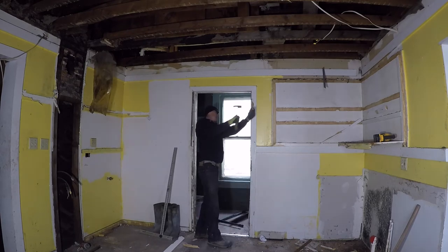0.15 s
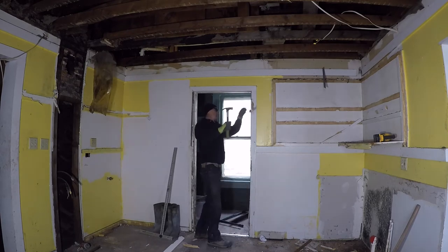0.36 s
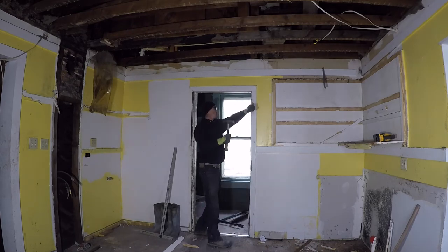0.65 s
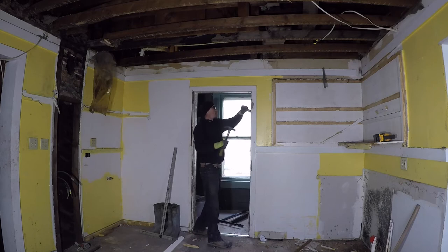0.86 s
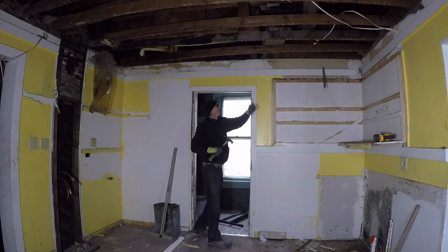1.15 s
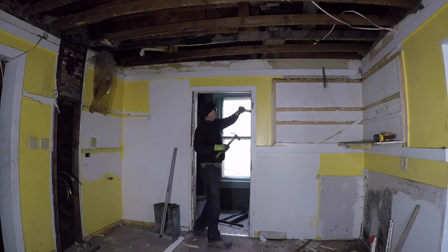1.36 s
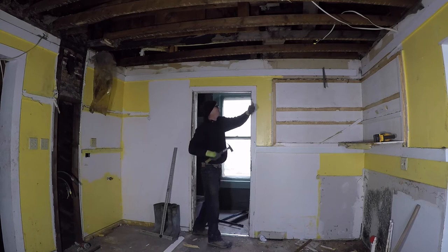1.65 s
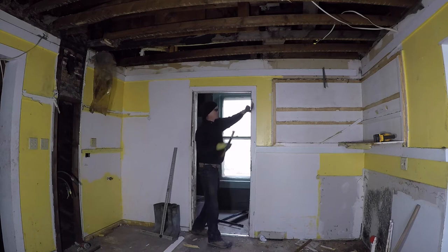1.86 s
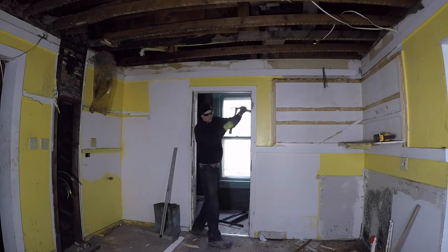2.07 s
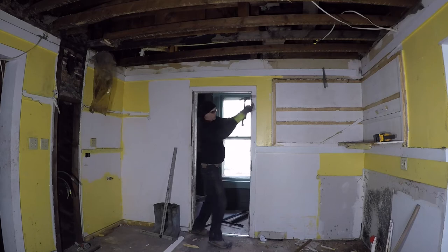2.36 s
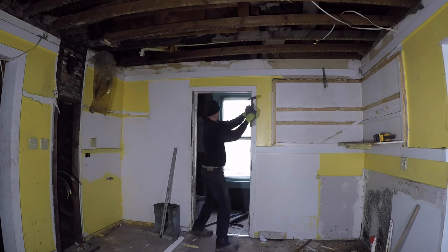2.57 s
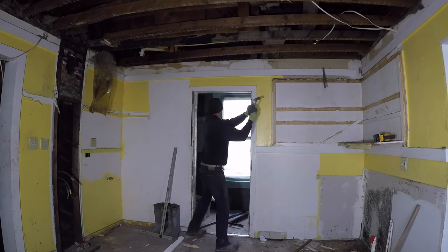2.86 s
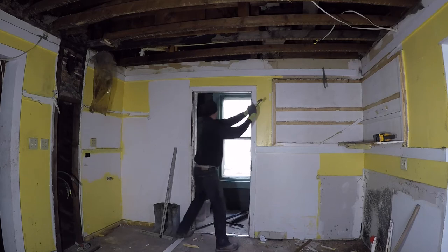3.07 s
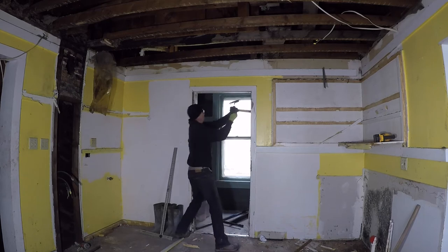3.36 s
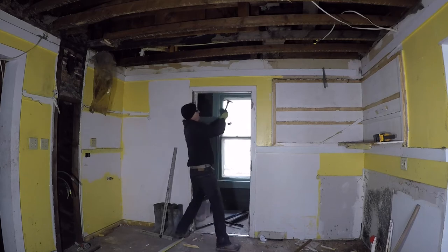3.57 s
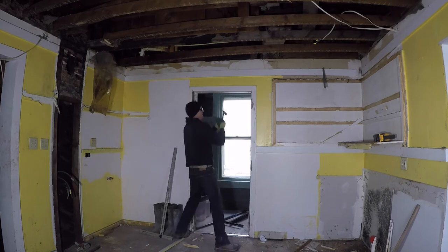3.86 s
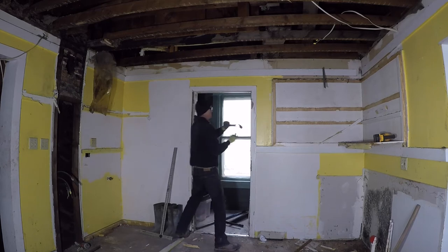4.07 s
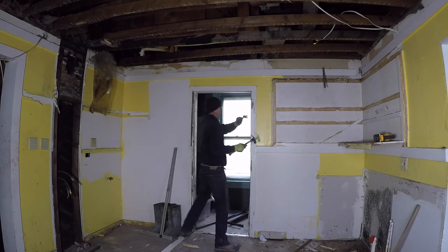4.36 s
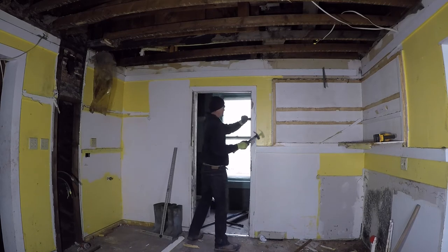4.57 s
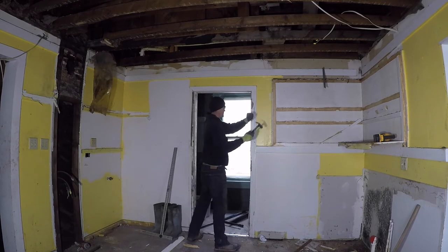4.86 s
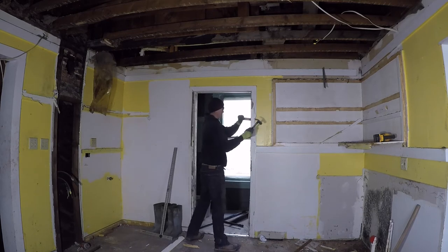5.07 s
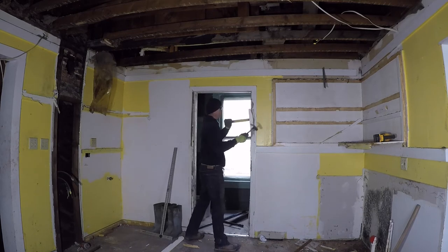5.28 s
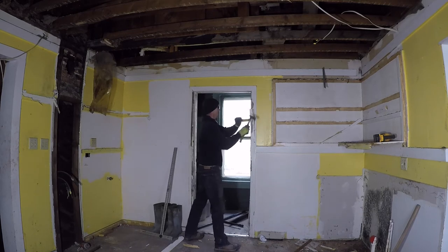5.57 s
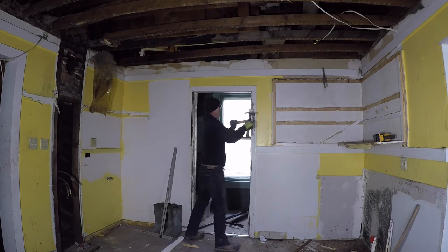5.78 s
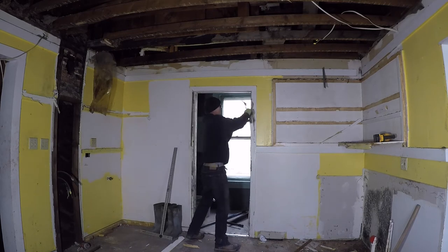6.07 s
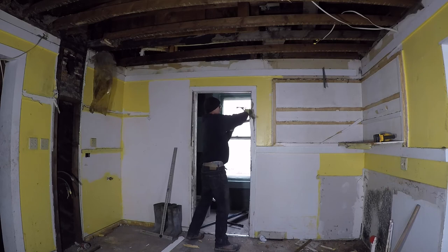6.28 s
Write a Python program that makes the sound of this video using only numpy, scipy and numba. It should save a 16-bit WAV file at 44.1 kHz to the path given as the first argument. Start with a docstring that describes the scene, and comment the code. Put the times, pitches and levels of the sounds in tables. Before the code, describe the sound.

A hammer clangs once on a crowbar in a bare room, followed by splintering door trim and soft boot thuds on floorboards.

```python
"""Crowbar behind a door jamb.

A hammer drives a steel crowbar in, a few metres off in a stripped room; bar rings, jamb knocks.
The bar levers the trim away: fibres and nails let go in cracks, drawn nails squeak, chips fall.
Boots shift on the boards, the timber frame booms, the bare walls ring on over a low house rumble.
Automatic gain control ducks after the loudest hits."""
import sys
import numpy as np
from scipy import signal
from scipy.fft import rfft, irfft
from scipy.io import wavfile
from scipy.ndimage import uniform_filter1d, minimum_filter1d
from numba import njit

SR = 44100
rng = np.random.default_rng(int(sys.argv[2]) if len(sys.argv) > 2 else 0)


def wav_out(sig):
    """Save sig, one row per channel (or a flat mono array), as 16-bit PCM at SR to the path in sys.argv[1]."""
    wavfile.write(sys.argv[1], SR, np.round(np.clip(np.atleast_2d(sig).T, -1, 1) * 32767).astype(np.int16))


N = 283563
SIZE = 32768  # samples per event
T = np.arange(SIZE) / SR
HZ = np.maximum(np.fft.rfftfreq(SIZE, 1 / SR), 1)


def undb(db):
    """dB to gain."""
    return 10 ** (np.asarray(db) / 20)


def level(x, db):
    """Scale x to db, its energy taken over 0.1 s."""
    return x * undb(db) / np.sqrt(np.sum(x ** 2) / (SR / 10))


def curve(points, hz):
    """Interpolate (f/Hz, value) points over log frequency."""
    f, value = np.transpose(points)
    return np.interp(np.log(hz), np.log(f), value)


def add(track, t_s, x):
    """Mix x into track at t_s."""
    i = max(int(t_s * SR), 0)
    track[i:i + len(x)] += x[:max(N - i, 0)]


def colour(x, gain_db):
    """Minimum-phase filter, gain_db given over HZ."""
    cepstrum = irfft(np.log(undb(gain_db)))
    cepstrum[1:SIZE // 2] *= 2
    cepstrum[SIZE // 2 + 1:] = 0
    return irfft(rfft(x, SIZE) * np.exp(rfft(cepstrum)))


def resonance(hz, width_hz):
    """Resonance magnitude, 1 at centre."""
    return 1 / np.hypot(1, (HZ ** 2 - hz ** 2) / (HZ * width_hz))


def shade(weight_db, tilt_db_oct, bass_hz=400, treble_hz=1200, top_hz=9000):
    """Gain in dB: more moving mass adds bass, a sharper break tilts the treble up."""
    octaves = np.log2(np.hypot(1, HZ / treble_hz) / np.hypot(1, HZ / top_hz))
    return weight_db / (1 + (HZ / bass_hz) ** 4) + tilt_db_oct * octaves


def ripple(depth_db, width_hz):
    """Gain in dB: the many close modes of one piece of wood."""
    bins = int(width_hz * SIZE / SR) + 1
    wavy = uniform_filter1d(uniform_filter1d(rng.standard_normal(len(HZ)), bins), bins)
    return depth_db * wavy / np.std(wavy) * HZ / (HZ + 600)


def burst(length_s, rate_hz, spread_db, dust, rise=0.11):
    """Swelling, dying run of uneven snaps in fine noise; rise is a fraction of length_s."""
    polarity, size, fine = rng.standard_normal((3, SIZE))
    fires = rng.random(SIZE) < rate_hz / SR
    snaps = fires * np.sign(polarity) * undb(spread_db * np.clip(size, -2, 1.5))
    return (snaps + dust * fine) * np.exp(-(T / length_s) ** 1.9) * (1 - np.exp(-T / (rise * length_s)))


def room(x, body_db, direct_db=-4, build_s=0.011, early_db=-2, early_t60_s=0.29):
    """Burst coloured by its body: direct sound, then diffuse echoes whose treble dies first."""
    # room decay: f/Hz, t60/s
    decay = [(60, 0.42), (250, 0.55), (800, 0.66), (2800, 0.57), (5500, 0.6), (9000, 0.36), (15000, 0.25)]
    # standing waves between doorway and listener: f/Hz, gain/dB
    standing_waves = [(80, 5), (132, 4), (165, -5), (205, -4), (243, 1), (280, 0), (316, 2.5), (360, 2.5),
                      (410, -0.5), (460, -1), (530, -3.5), (600, 1), (1000, 2.5)]
    centres_hz = np.geomspace(120, 15000, 8)
    noise = rfft(rng.standard_normal(SIZE))
    tail = 0
    for hz, share in zip(centres_hz, np.eye(len(centres_hz))):
        band = irfft(noise * np.interp(np.log(HZ), np.log(centres_hz), share))
        tail = tail + band * undb(-60 * T / curve(decay, hz))
    # the burst fills the room; near walls answer first and strongest
    filled = np.sqrt(np.cumsum(x ** 2) / np.sum(x ** 2)) * (1 - np.exp(-T / build_s))
    tail = tail * filled * (1 + undb(early_db - 60 * T / early_t60_s))
    return colour(level(x, direct_db) + level(tail, 0), body_db + curve(standing_waves, HZ))


def room_tone(rms_db=-50):
    """Low house rumble and faint steady hiss."""
    # noise spectrum: f/Hz, relative density/dB
    spectrum = [(20, -8.5), (48, -9), (70, -14), (120, -31.5), (180, -35.5), (480, -39.5), (850, -39),
                (1500, -47.5), (2600, -45), (4000, -51), (5000, -49), (9000, -57), (15000, -61)]
    hz = np.maximum(np.fft.rfftfreq(N, 1 / SR), 1)
    noise = irfft(rfft(rng.standard_normal(N)) * undb(curve(spectrum, hz)), N)
    return noise * undb(rms_db) / np.std(noise)


def frame_boom(db, hardness_db_oct):
    """A shove sets joists and wall booming; a soft one builds slowly and favours the lowest mode."""
    # frame and floor modes: f/Hz, level/dB, t60/s
    modes = [(30.65, -0.5, 0.7), (39.23, -8.5, 0.79), (46.1, -6.5, 0.78), (71.2, -14, 0.62),
             (81.06, -14, 0.13), (113, -16.5, 0.27)]
    boom = 0
    for hz, mode_db, t60_s in modes:
        detuned_hz = hz * (1 + 0.014 * rng.standard_normal())
        envelope = undb(mode_db + hardness_db_oct * np.log2(hz) - 60 * T / t60_s)
        boom = boom + envelope * np.sin(2 * np.pi * detuned_hz * T)
    rise_s = 0.0057 * np.exp(-0.05 * hardness_db_oct)
    return level(boom * (1 - np.exp(-T / rise_s)), db)


def leaning():
    """Body weight on bar and floor sways the frame: a soft boom, no knock."""
    # weight shifts: t/s, level/dB
    leans = [(1.905, -33.5), (4.195, -31.5), (4.392, -39.5), (4.598, -24.5), (5.591, -23.5)]
    out = np.zeros(N)
    for t_s, db in leans:
        add(out, t_s, frame_boom(db, hardness_db_oct=-13.5))
    return out


def taps(q=12, overtone_ratio=1.4, overtone_db=-5, tilt_db_oct=-2.5):
    """Tools and falling chips: clicks with two short resonances, duller at low pitch."""
    # light contacts: t/s, level/dB, f/Hz, ring over click/dB
    contacts = [(2.276, -52, 298, 31), (2.729, -59, 6130, -12.5), (2.828, -65.5, 6070, -19),
                (3.935, -51, 2450, 6), (4.108, -50, 1940, 12), (4.240, -53.5, 3200, -10),
                (4.367, -58, 8500, 8), (5.812, -54.5, 2800, -9), (5.90, -60.5, 5900, 0),
                (6.141, -58, 8700, 22.5), (6.412, -50, 8700, 22.5)]
    out = np.zeros(N)
    for t_s, db, hz, ring_db in contacts:
        modes = resonance(hz, hz / q) + undb(overtone_db) * resonance(hz * overtone_ratio, hz / q)
        body_db = 20 * np.log10(1 + undb(ring_db) * modes) + tilt_db_oct * np.log2(np.hypot(1, HZ / 500))
        cutoff_hz = min(3.7 * hz, 10000)  # contact time softens the top
        body_db -= 10 * np.log10(1 + (HZ / cutoff_hz) ** 4)
        click = burst(length_s=0.003, rate_hz=2800, spread_db=3.5, dust=0.23)
        add(out, t_s, level(room(click, body_db, direct_db=-6), db))
    return out


def nail_squeaks(width_hz=60):
    """A drawn nail sticks and slips in the wood, singing briefly at one pitch."""
    # squeaks: t/s, level/dB, f/Hz
    squeaks = [(4.562, -56, 3500), (5.600, -64, 4800), (5.748, -71, 4840)]
    out = np.zeros(N)
    for t_s, db, hz in squeaks:
        slips = burst(length_s=0.027, rate_hz=3000, spread_db=3, dust=0.3, rise=0.3)
        body_db = 20 * np.log10(resonance(hz, width_hz) ** 2 + 0.0012)
        add(out, t_s, level(room(slips, body_db, direct_db=9), db))
    return out


def boots(shove_db=1.5):
    """Soles and loose trim knock and scuff on gritty boards; the joists boom below."""
    # knocks: t/s, level/dB, scuff/s, bass weight/dB, grit tilt/(dB/oct)
    steps = [(0.731, -37, 0.015, 5.5, 7), (1.262, -47, .046, 10, -24), (1.693, -55.5, 0.018, -6, 1),
             (2.386, -50, 0.093, 9.5, 2.5), (2.499, -41.5, 0.021, -11, 1), (2.516, -26.5, 0.0092, 14, 3),
             (3.097, -45.5, 0.035, 0, 4), (3.90, -41, 0.025, 17.5, -10), (4.243, -35.5, 0.028, 5, -25),
             (4.472, -31, .012, -3.5, 0), (4.574, -35.5, .015, -3, -3), (4.679, -39, 0.0052, -10.5, -17.5),
             (4.78, -44.5, .044, 3.5, -12), (4.934, -38.5, .02, 4.5, -2.5), (4.970, -36.5, 0.0084, 1.5, 1),
             (5.72, -40.5, .035, 3, -4), (6.413, -36.5, 0.0041, -14, 0)]
    # floorboard under a heel: f/Hz, gain/dB
    heel = [(35, 2.5), (100, 5.5), (175, 0), (260, -0.5), (380, -5.5), (500, -9.5), (700, -2.5),
            (1100, -15), (2000, -22), (4000, -29.5), (8000, -39.5), (15000, -53.5)]
    out = np.zeros(N)
    for t_s, db, scuff_s, weight_db, tilt_db_oct in steps:
        body_db = curve(heel, HZ) + shade(weight_db, tilt_db_oct, bass_hz=170)
        body_db += ripple(depth_db=5, width_hz=10)
        scuff = burst(scuff_s, rate_hz=1500, spread_db=3, dust=0.2, rise=0.25)
        add(out, t_s, level(room(scuff, body_db, direct_db=-2.5), db))
        # heavier contacts reach higher modes
        add(out, t_s, frame_boom(db + shove_db, hardness_db_oct=-8 + weight_db))
    return out


def hammer(ring_db=-6, beat_hz=16, echo_gain=0.94, clang_db=7, clang_width_hz=170, shove_db=-11):
    """The head chatters on the bar: steel rings, jamb knocks, frame booms."""
    # hammer on bar: t/s, level/dB
    blows = [(0.009, -13)]
    # crowbar modes: f/Hz, level/dB, t60/s
    bar_modes = [(2589, -9, .45), (2701, -8, .44), (2978, -3, .46), (4102, -2.5, .47), (4172, -16, .65),
                 (5064, -7, .5), (5227, -11, .53), (5298, -9, .55), (5351, -13, .52), (5433, -9, .4),
                 (5803, -19, .55), (6805, -4, .32), (6848, 1.5, .54), (6885, -5, .38), (7079, -10, .3),
                 (8016, -16, .34), (8807, -14, .36), (10580, -13, .3), (11570, -17, .22), (12020, -21, .56),
                 (14560, -21, .26)]
    # struck jamb: f/Hz, gain/dB
    jamb = [(40, 1.5), (90, -7.5), (180, 2.5), (290, -9.5), (520, -9.5), (780, -5), (1050, -12.5),
            (2000, -18.5), (3000, -18), (6000, -15), (9000, -22.5), (15000, -30.5)]
    out = np.zeros(N)
    steel = sum(undb(mode_db) * resonance(hz, clang_width_hz) ** 2 for hz, mode_db, _ in bar_modes)
    body_db = curve(jamb, HZ) + 20 * np.log10(1 + undb(clang_db) * steel)
    onset = 1 - np.exp(-(T / 0.0022) ** 2)
    for t_s, db in blows:
        chatter = burst(length_s=0.045, rate_hz=2500, spread_db=2.5, dust=0.1, rise=0.12)
        knock = room(chatter, body_db, direct_db=3.5)
        ring = 0
        for hz, mode_db, t60_s in bar_modes:
            # echoes of the moving bar beat against each mode
            echo_hz = hz + beat_hz * rng.standard_normal((5, 1))
            echoes = np.sin(2 * np.pi * (echo_hz * T + rng.random((5, 1))))
            tone = np.sin(2 * np.pi * hz * T) + echo_gain * echoes.sum(axis=0) / np.sqrt(len(echoes))
            ring = ring + tone * undb(mode_db - 60 * T / t60_s)
        add(out, t_s, level(knock, db) + level(ring * onset, db + ring_db))
        add(out, t_s, frame_boom(db + shove_db, hardness_db_oct=-9.5))
    return out


def prying(strain_s=0.042, strain_db=-23.5, strain_limit_db=-52):
    """Wood creaks under strain, then runs of breaking fibres ring the trim and shove the frame."""
    # trim tearing loose: t/s, level/dB, tear/s, treble tilt/(dB/oct), board ring/dB,
    # direct over room/dB, frame boom/dB
    cracks = [(0.736, -37, 0.017, -7.5, -3, -4, -62), (0.823, -33, 0.02, -1.5, -3, 2, -47),
              (1.354, -31, 0.042, 2.5, -4, 4.5, -30), (1.936, -34, 0.07, 4.5, -3, 6, -45),
              (3.304, -21, 0.0089, 6.5, 4.5, 10, -42), (3.327, 1, 0.026, 2.5, -7, -4.5, -7.5),
              (3.413, -6, 0.026, 4.5, 2.5, 8.5, -8), (5.102, -36, 0.012, 5, -6.5, -3, -46),
              (5.126, -19, 0.032, 4, -16.5, -5, -47.5), (5.204, -22, 0.0093, 4, -17.5, 0.5, -37),
              (5.261, -21.5, 0.028, -2.5, -22.5, 2.5, -31.5), (5.544, -28, 0.0097, -8.5, -15, -0.5, -58)]
    # splintering wood: f/Hz, gain/dB
    fibres = [(40, -3), (75, 2.5), (130, 2), (190, 1.5), (280, -2.5), (500, 2.5), (720, 3), (1300, -2.5),
              (1800, -9.5), (3200, -6.5), (4000, -10.5), (6000, -12.5), (9000, -20), (15000, -28)]
    # trim board resonances: f/Hz, width/Hz, gain/dB
    board_modes = [(833, 37, 5.5), (942, 102, 4.5), (2286, 810, 6.5), (3005, 140, -2), (3960, 92, -10)]
    out = np.zeros(N)
    fibres_db = curve(fibres, HZ)
    board = sum(undb(db) * resonance(hz, width_hz) ** 2 for hz, width_hz, db in board_modes)
    for t_s, db, tear_s, tilt_db_oct, ring_db, direct_db, boom_db in cracks:
        # louder cracks move more wood, longer tears are fuller: both add bass
        weight_db = 0.5753 * (db + 20) + 2.5 * np.log2(tear_s / 0.021)
        body_db = fibres_db + shade(weight_db, tilt_db_oct) + 20 * np.log10(1 + undb(ring_db) * board)
        body_db += ripple(depth_db=2, width_hz=49)
        creak = burst(strain_s, rate_hz=1500, spread_db=3, dust=0.3, rise=0.9)
        add(out, t_s - strain_s, level(room(creak, fibres_db), min(db + strain_db, strain_limit_db)))
        tear = burst(tear_s, rate_hz=3500, spread_db=10, dust=0.36)
        add(out, t_s, level(room(tear, body_db, direct_db), db))
        add(out, t_s, frame_boom(boom_db, hardness_db_oct=-10 + weight_db))
    return out


def scene():
    """Work at the doorway over the quiet house, mono."""
    return (hammer() + prying() + boots() + leaning() + taps() + nail_squeaks() + room_tone())[None]


@njit
def follow(x, attack_s, release_s):
    """Attack/release envelope follower."""
    out, envelope = np.empty(len(x)), 0.
    for i in range(len(x)):
        envelope += (x[i] - envelope) / (SR * (attack_s if x[i] > envelope else release_s))
        out[i] = envelope
    return out


def record(dry, knee_db=-13, attack_s=0.004, hold_s=0.2, release_s=0.26, ceiling=0.55, top_hz=15350):
    """Gain control ducks after loud hits and holds; then soft clip and low-pass."""
    loud_db = 10 * np.log10(np.abs(uniform_filter1d(dry[0] ** 2, size=160)) + 1e-12)
    duck_db = np.minimum(knee_db - loud_db, 0)
    half_hold = int(hold_s * SR / 2)
    held_db = minimum_filter1d(duck_db, 2 * half_hold + 1, origin=half_hold, mode="constant")
    gain = undb(-follow(-held_db, attack_s, release_s))
    rounded = ceiling * np.tanh(dry * gain / ceiling)
    return signal.sosfilt(signal.ellip(10, 0.2, 80, top_hz, fs=SR, output="sos"), rounded)


dry = scene()
out = record(dry)
wav_out(out)
```